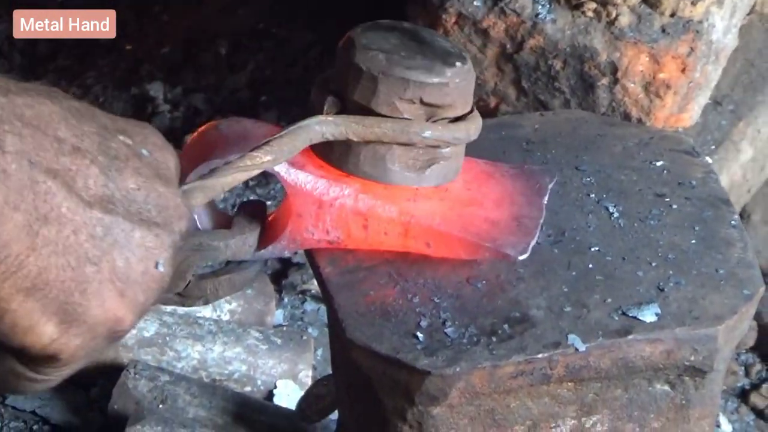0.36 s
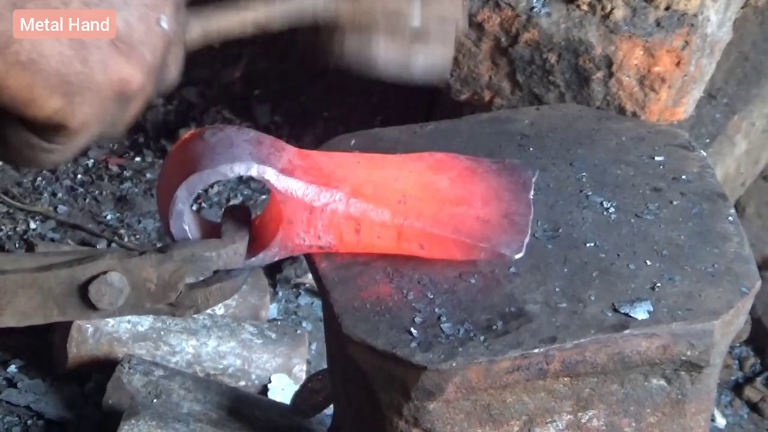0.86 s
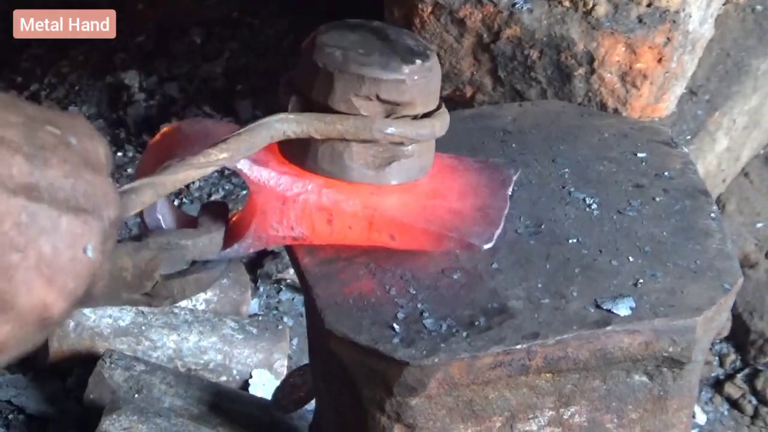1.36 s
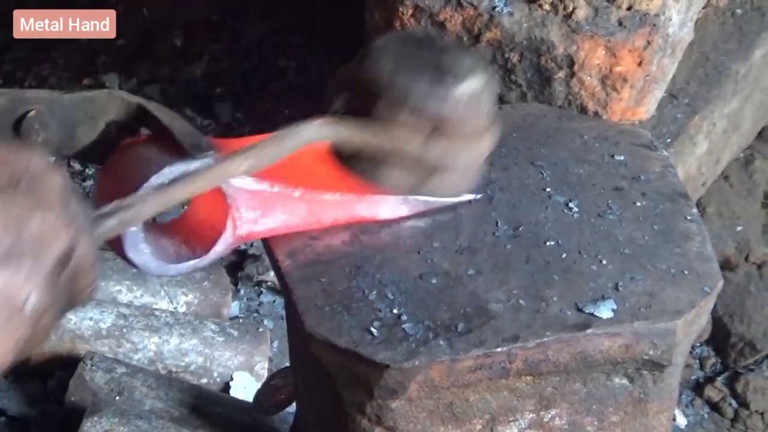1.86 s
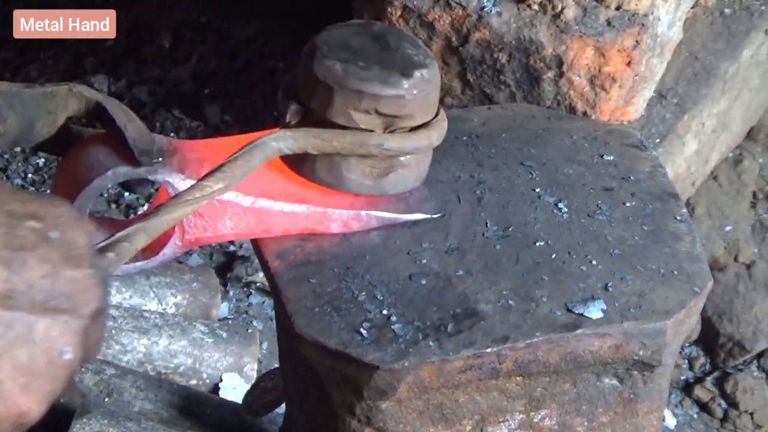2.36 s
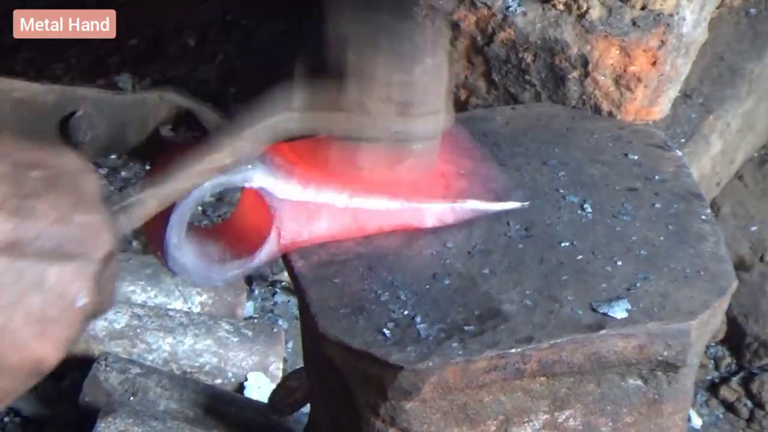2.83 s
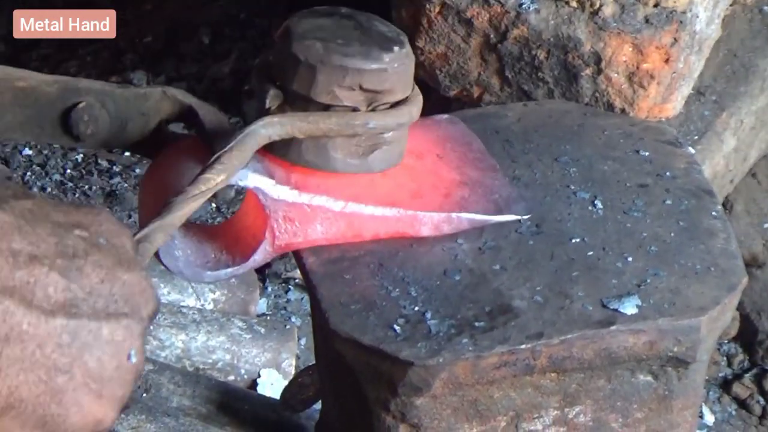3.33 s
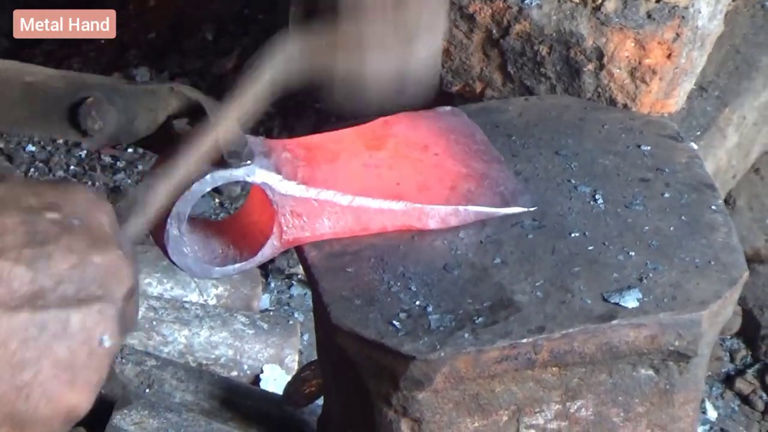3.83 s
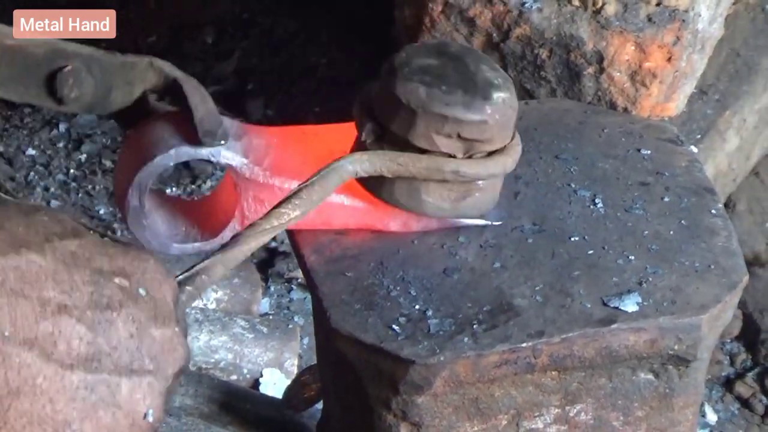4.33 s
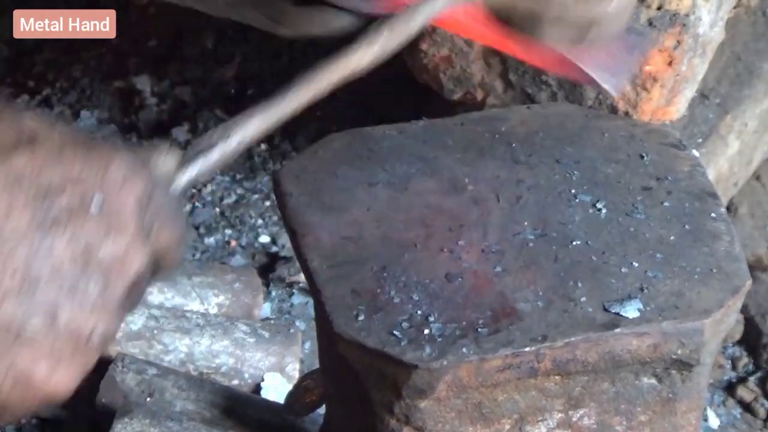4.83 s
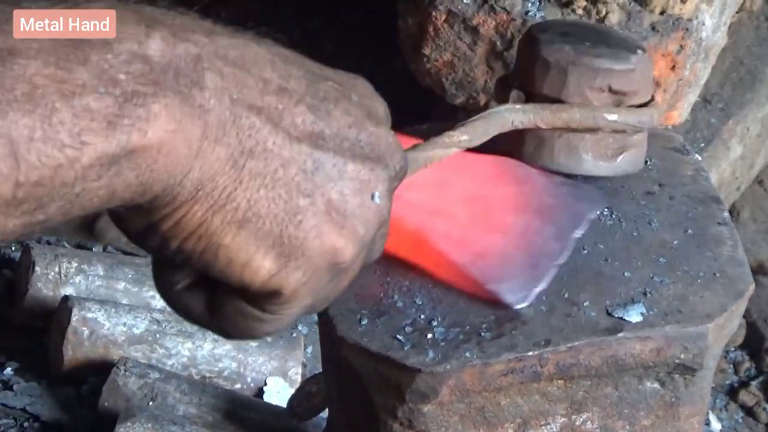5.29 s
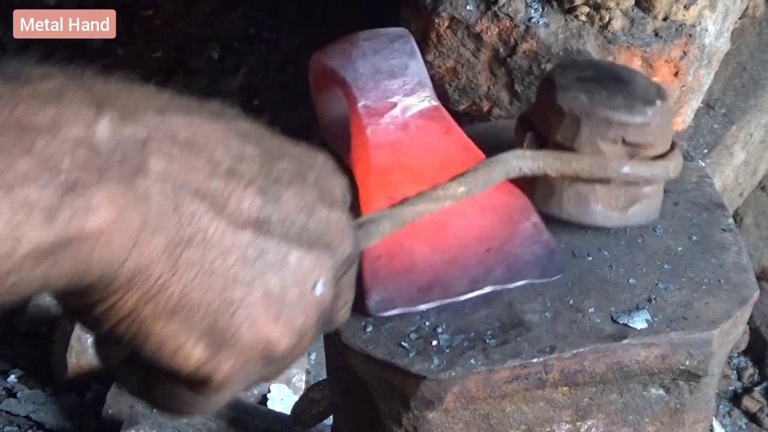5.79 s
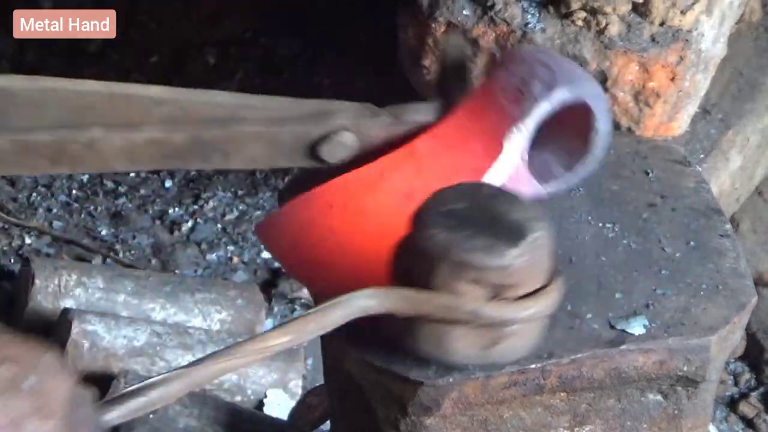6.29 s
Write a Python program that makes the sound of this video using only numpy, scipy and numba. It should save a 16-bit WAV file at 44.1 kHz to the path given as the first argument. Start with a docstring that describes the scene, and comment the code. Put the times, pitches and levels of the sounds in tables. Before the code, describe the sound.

In a small forge shed, a heavy sledge hits a set hammer on hot iron about once a second, each blow a broad crack with high ringing and a low thud. Between blows come firm, gritty taps and small tong clinks. After the fifth blow the sledge stops, leaving handling clatter, scrapes and lighter taps. Close, bright microphone, loud hits flattened, short dense echo.

```python
"""A sledge lands about once a second on a set hammer in a small forge: a broad crack, ringing heads, a thud.
Between blows a smith taps the set hammer firmly on the hot iron: a gritty burst, a dull knock, a brief ring.
Tongs and work piece clink, scrape and squeak on the anvil; these are short noise bursts and fading tones.
The shed adds a short dense tail of fading noise, over a low shudder and a soft outdoor rumble.
The close sound is bright near 9 kHz, and a fast limiter flattens the sledge blows."""
import sys
import numpy as np
from scipy import signal
from scipy.fft import rfft, irfft
from scipy.io import wavfile
from scipy.ndimage import uniform_filter1d
from numba import njit

SR = 44100
rng = np.random.default_rng(int(sys.argv[2]) if len(sys.argv) > 2 else 0)


def bounce(signal):
    """Save signal as a 16-bit WAV file at the path given by the first command-line argument."""
    frames = np.transpose(np.atleast_2d(signal))
    limited = np.clip(frames, -1, 1)
    pcm = np.round(limited * 32767).astype(np.int16)
    wavfile.write(sys.argv[1], SR, pcm)


def voltage_ratio(level):
    """Linear amplitude factor for a level in decibels (scalar or array-like)."""
    return 10 ** (np.asarray(level, float) / 20)


N = 293706  # length of the scene in samples

# Outdoor rumble and hiss. Each row: frequency in Hz, relative level in dB per Hz.
YARD_COLOUR = [(12, -43.5), (20, -18), (38, 3.5), (75, -2), (124, -2), (218, -2), (393, -5.5), (750, -9),
               (816, -10), (1320, -12.5), (3620, -17.5), (15200, -23), (16500, -46.5)]
# How wide the yard sounds. Each row: frequency in Hz, side level minus mid level in dB.
YARD_WIDTH = [(60, -10.5), (110, -21.5), (200, -8.5), (380, -3.5), (700, 0), (1290, 0), (2380, -1.5),
              (4400, -5), (8120, -12), (15000, -16.5)]
# Shudder of ground and roof. Each row: frequency in Hz, relative level in dB per Hz.
RUMBLE_COLOUR = [(15, -30), (25, -8), (54, -1), (221, -9), (260, -7.5), (436, -15.5), (600, -21),
                 (780, -35), (1320, -120)]
# How long the shed echoes. Each row: frequency in Hz, time to fall by 60 dB in seconds.
SHED_FADE = [(60, 0.3), (200, 0.22), (530, 0.21), (1400, 0.19), (3700, 0.18), (9700, 0.14), (15000, 0.12)]
# How wide the shed sounds. Each row: frequency in Hz, side level minus mid level in dB.
SHED_WIDTH = [(60, -34), (110, -25), (200, -15.5), (380, -14), (700, -9.8), (1290, -6.5), (2380, -11.5),
              (4400, -4.5), (8120, -10), (15000, -13)]

# Tong joint. One row: start in seconds, length in seconds, first pitch in Hz, last pitch in Hz, level in dB.
TONG_SQUEAK = (6.355, .14, 2760, 2530, -65)
# Iron dragged over the anvil face. Each row: start in seconds, level in dB, bass in dB, middle in dB,
# knock frequency in Hz.
SCRAPE_EVENTS = [(0.0034, -50.5, 10, 8, 2000), (1.0042, -60.5, -1, 4, 8440),
                 (1.7338, -40.5, 12.5, 12.5, 4580), (5.123, -31.5, 0.5, 8.5, 11000),
                 (5.4523, -50, -3, 20, 9740), (6.4751, -48, -4.5, 3, 2590), (6.492, -47, 4, 11, 1980)]
# Tongs and work piece clinking on the anvil. Each row: start in seconds, level in dB, bass in dB,
# middle in dB, knock frequency in Hz.
CLINK_EVENTS = [(0.0299, -42, 9, 8, 5040), (0.0622, -47, -1, 3, 8150), (0.7021, -36.5, -8, 11, 8400),
                (0.9544, -47, 10, 16, 5710), (0.9895, -44.5, 7, 13, 2116), (1.8019, -44.5, 28.5, 18, 2480),
                (1.8516, -34.5, 3, 14, 1830), (2.058, -52.5, 22, 20, 2060), (2.789, -34.5, -4, 5, 1870),
                (2.796, -41, 0, 10, 1870), (2.803, -50.5, -5.5, 9.5, 2230), (3.1438, -36, -10, 4, 5860),
                (3.554, -46, -6.5, 8.5, 8400), (3.5715, -32, -6.5, 7, 8990), (3.776, -47, -8, 4.5, 8300),
                (3.817, -41, -8, 11, 9300), (3.826, -36, -14, 8, 7700), (3.842, -45, -13, 12, 9200),
                (4.9481, -36.5, 12, 8, 6390), (5.474, -41.5, -12, 15, 6600),
                (5.4864, -55, -9.5, 15.5, 6600), (5.5307, -43.5, 9, 19, 3580),
                (5.5494, -33, 3.5, 17, 10760), (5.6075, -23, -7, 6, 5325), (5.7075, -39.5, 17, 19, 10200),
                (5.738, -31.5, 22, 18, 6100), (6.4527, -42.5, 12, 7, 2600), (6.507, -38, 2.5, 11.5, 5520)]
# Set hammer laid firmly on the iron. Each row: start in seconds, level in dB, bass in dB, middle in dB,
# knock frequency in Hz.
TAP_EVENTS = [(0.0928, -16, 5.5, 12, 4740), (0.7739, -17.5, 2, 10, 5120), (1.0808, -14, 2, 10, 5300),
              (1.8652, -11.5, -5, 8, 4600), (2.2221, -14.5, 2.5, 5, 4060), (2.8723, -10.5, -0.5, 4.5, 6400),
              (3.1946, -15.5, 5, 11.5, 4600), (3.898, -12.5, 0, 4.5, 4710), (4.269, -11.5, -2, 8.5, 5000),
              (4.9705, -20.5, -0.5, 3.5, 6150), (5.1657, -18.5, 0, 9, 8320), (5.21, -24, 5.5, 6, 8200),
              (6.2015, -26.5, -12, 7, 10580), (6.2445, -33, -4, 9.5, 10000)]
# Jaws and reins of the tongs. Each row: frequency in Hz, relative level in dB, time to fall by 60 dB in seconds.
TONG_MODES = [(2050, -29.5, .02), (3400, -29, .02), (4550, -20.5, .02), (6200, -19.5, .02),
              (8050, -9, 0.02), (9300, -6, 0.019), (9600, 3, .016), (11300, -10, .014),
              (12200, -20.5, .015), (13000, -24, .015)]
# Set hammer head, damped by hot iron. Each row: frequency in Hz, relative level in dB,
# time to fall by 60 dB in seconds.
SET_HAMMER_MODES = [(4470, -16, 0.015), (5120, -19.5, .012), (6870, -17, .012), (7770, -10, 0.032),
                    (8420, -8, .016), (8980, 0, 0.025), (9830, -11.5, 0.007), (12200, -16.5, .015),
                    (13000, -23.5, .015)]
# Crushing noise of taps, clinks and scrapes. Each row: frequency in Hz, relative level in dB per Hz.
CRUSH_COLOUR = [(88, -39.5), (150, -22), (231, -9.5), (409, -14), (630, -8.5), (1010, -14.5), (2500, -16),
                (4690, -11.5), (6050, -6), (9150, 7.5), (14400, -9), (15300, -19.5), (16500, -54.5)]
# Where the bass, middle and top of a contact are set. Each entry: frequency in Hz.
TILT_POINTS = [840, 3240, 7510]

# Sledge blows. Each row: start in seconds, then relative levels in dB of the thud, the lower head ring,
# the upper head ring and the long ring.
SLEDGE_BLOWS = [(-0.5, -18, -12, -8, -20), (0.4674, -20, -8.5, -2.5, -18),
                (1.4885, -16.5, -7.5, -17, -24.5), (2.5316, -17, -6.5, -1, -29),
                (3.5759, -16.5, -17.5, -7, -26.5), (4.6325, -17.5, -1, -11.5, -23.5)]
# Crack of the sledge. Each row: frequency in Hz, relative level in dB per Hz.
SLEDGE_COLOUR = [(130, -18.5), (220, -8), (461, -5.5), (605, -11), (662, -5), (808, -8.5), (917, -6.5),
                 (2570, -14), (6810, -8.5), (9420, -3), (13000, -14), (14500, -27.5), (16500, -64.5)]
# Sledge head and set hammer. Each row: frequency in Hz, relative level in dB, time to fall by 60 dB in seconds,
# ring group (0 lower, 1 upper, 2 long).
HEAD_MODES = [(7975, -12, .2, 0), (8380, 0, .17, 0), (8600, -12, .14, 0), (9130, -12, .14, 1),
              (9543, 0, .17, 1), (11100, -16, .12, 1), (12085, -10, .14, 1), (14057, -2, .75, 2),
              (4140, -25, .7, 2)]
# Anvil stump and earth floor. Each row: frequency in Hz, relative level in dB, time to fall by 60 dB in seconds.
STUMP_MODES = [(145, 1, .24), (203, -5, .22), (253, -5, .22), (323, -1, .22), (465, -5, .2), (680, -9, .16),
               (910, -8, .15)]


def at(table, hz):
    """Reads a value between the rows of a table, with frequency on a log axis."""
    table_hz, values = np.array(table).T
    return np.interp(np.log(np.maximum(hz, 1)), np.log(table_hz), values)


def noise(table, size):
    """Steady noise shaped by a colour table, then scaled to an rms of 1."""
    hz = np.fft.rfftfreq(size, 1 / SR)
    x = irfft(rfft(rng.standard_normal(size)) * voltage_ratio(at(table, hz)), size)
    return x / x.std()


def waver(rate, depth_db, size):
    """Slow random swell, as of echoes and near-twin modes beating; rate is in random steps per second."""
    step = int(SR / rate)
    levels = np.repeat(rng.standard_normal(size // step + 1), step)
    return voltage_ratio(depth_db * uniform_filter1d(levels, step)[:size])


def ring(hz, t60, size):
    """One way a solid body rings: a sine that falls by 60 dB in t60 seconds."""
    t = np.arange(size) / SR
    return np.sin(2 * np.pi * hz * t) * 1000. ** (-t / t60)


def burst(table, shape, tilt=1, count=2):
    """Dense crushing noise that keeps a smooth colour however short; rms is near 1 where the shape is 1."""
    size = len(shape)
    colour = voltage_ratio(at(table, np.fft.rfftfreq(size, 1 / SR))) * tilt
    x = rng.standard_normal(size)
    for _ in range(count):
        # keep only the phases of the shaped noise and give it the wanted colour again
        phase = np.angle(rfft(x * np.sqrt(shape)))
        x = irfft(colour * np.exp(1j * phase), size)
    x = x * np.minimum(10 * shape, 1)
    return x * np.sqrt(np.sum(shape ** 2) / np.sum(x ** 2))


def add(track, s, sound):
    """Mixes a sound in at a time in seconds, which may lie before the start."""
    i = int(s * SR)
    track[max(i, 0):max(i + len(sound), 0)] += sound[max(-i, 0):N - i]


def yard():
    """Steady low outdoor rumble over microphone hiss, made of coloured noise; mid and side."""
    hz = np.fft.rfftfreq(N, 1 / SR)
    mid = noise(YARD_COLOUR, N)
    side = irfft(rfft(noise(YARD_COLOUR, N)) * voltage_ratio(at(YARD_WIDTH, hz)), N)
    return voltage_ratio(-61.5) * np.array([mid, side])


def rumble(size=SR):
    """Ground and roof shudder on after each sledge blow as slowly fading low noise; mid and side."""
    out, t = np.zeros((2, N)), np.arange(size) / SR
    fade = (1 - np.exp(-t / 0.04)) * 1000. ** (-t / 1.314) * voltage_ratio(-41.5)
    for s, *_ in SLEDGE_BLOWS:
        add(out[0], s, fade * noise(RUMBLE_COLOUR, size))
        add(out[1], s, fade * noise(RUMBLE_COLOUR, size) * voltage_ratio(-21.5))
    return out


def shed(first_ms=0.59, build_ms=3.1, late_db=-34, size=SR):
    """Echo tails of the shed, mid and side: half-octave bands of noise, each dying at its own rate."""
    t = np.maximum(np.arange(size) / SR - first_ms / 1000, 0)
    hz = np.fft.rfftfreq(size, 1 / SR)
    spectra, tails = rfft(rng.standard_normal((2, size))), 0
    for centre in 30 * 2 ** np.arange(0, 9.6, .5):
        share = np.maximum(1 - 2 * abs(np.log2(np.maximum(hz, 1) / centre)), 0)
        t60 = at(SHED_FADE, centre)
        early = 1000. ** (-t / t60)
        # a faint slower tail returns from the yard outside
        late = voltage_ratio(late_db) * 1000. ** (-t / (3.2 * t60))
        fade = (early + late) * (1 - np.exp(-t * 1000 / build_ms))
        width = voltage_ratio([[0], [at(SHED_WIDTH, centre)]])
        tails = tails + width * irfft(spectra * share, size) * fade / np.sqrt(np.sum(fade ** 2))
    return tails


def squeak():
    """The tong joint squeaks faintly: a wavering sine that falls in pitch."""
    start, length, from_hz, to_hz, db = TONG_SQUEAK
    size = int(length * SR)
    turns = np.cumsum(np.linspace(from_hz, to_hz, size)) / SR
    swell = np.hanning(size) * waver(154, 5.3, size)
    out = np.zeros(N)
    add(out, start, voltage_ratio(db) * swell * np.sin(2 * np.pi * turns))
    return out


def contacts(table, modes, rise_ms, hold_ms, fall_ms, grit_db, ring_db, knock_db, size=4096):
    """Iron on iron: a short gritty burst of crushed scale, a dull knock and a brief ring of the tool."""
    out, ms = np.zeros(N), np.arange(size) * 1000 / SR
    hz = np.maximum(np.fft.rfftfreq(size, 1 / SR), 1)
    onset = 1 - np.exp(-ms / rise_ms)
    push = onset * np.exp(-np.maximum(ms - hold_ms, 0) / fall_ms)
    spots = rng.standard_normal((len(table), len(modes)))
    for (s, db, bass_db, middle_db, knock_hz), spot in zip(table, spots):
        tilt_db = np.interp(np.log(hz), np.log(TILT_POINTS), [bass_db, middle_db, 0])
        # the knock is a bump in the colour, 590 Hz to either side
        tilt_db = tilt_db + knock_db * np.exp(-((hz - knock_hz) / 590) ** 2)
        # each touch lands on another spot and wakes the modes differently, with a scatter of 4 dB
        tool = sum(voltage_ratio(mode_db + ring_db + 4 * luck) * ring(mode_hz, t60, size)
                   for (mode_hz, mode_db, t60), luck in zip(modes, spot))
        # grit breaks up the push but leaves its energy
        gritty = push * waver(330, grit_db, size)
        gritty = gritty * np.linalg.norm(push) / np.linalg.norm(gritty)
        # random lumps in the colour, one step every 24 frequency bins
        lumps = waver(SR / 24, 3, len(hz))
        crush = burst(CRUSH_COLOUR, gritty, voltage_ratio(tilt_db) * lumps)
        add(out, s, voltage_ratio(db) * (crush + onset * tool))
    return out


def handling():
    """Tongs and work piece on the anvil: short ringing clinks, longer gritty drags and a squeak."""
    clinks = contacts(CLINK_EVENTS, TONG_MODES, rise_ms=0.91, hold_ms=1.3, fall_ms=2.5,
                      grit_db=4.0, ring_db=0.0, knock_db=11.0)
    scrapes = contacts(SCRAPE_EVENTS, TONG_MODES, rise_ms=2.7, hold_ms=3.5, fall_ms=16.0,
                       grit_db=5, ring_db=1.0, knock_db=12.0)
    return clinks + scrapes + squeak()


def taps():
    """Firm taps of the set hammer; the hot iron damps the contact, so the ring is brief."""
    return contacts(TAP_EVENTS, SET_HAMMER_MODES, rise_ms=2.65, hold_ms=6.06, fall_ms=2.2,
                    grit_db=7.5, ring_db=-1.7, knock_db=6.0)


def sledge(fall_ms=8.1, size=SR, count=4096):
    """Sledge blows: a broad crack of noise; apart from it the ringing heads and the thud into the stump."""
    cracks, rings, t = np.zeros(N), np.zeros(N), np.arange(size) / SR
    short = t[:count]
    shape = (1 - np.exp(-short / 0.0019)) * np.exp(-short * 1000 / fall_ms)
    for s, thud_db, *ring_db in SLEDGE_BLOWS:
        crack = burst(SLEDGE_COLOUR, shape)
        heads, thud = np.zeros(size), np.zeros(size)
        for hz, db, t60, group in HEAD_MODES:
            heads += voltage_ratio(db + ring_db[group]) * ring(hz, t60, size) * waver(70, 3.5, size)
        for hz, db, t60 in STUMP_MODES:
            # the heavy stump takes a few cycles to get moving
            start = 1 - np.exp(-t * hz / 7.0)
            thud += voltage_ratio(db) * ring(hz, t60, size) * start * waver(35, 5, size)
        add(cracks, s, voltage_ratio(-1.78) * crack)
        add(rings, s, heads + voltage_ratio(thud_db) * thud)
    return cracks, rings


def scene():
    """Puts the direct sounds in the middle and the echoes around them, as left and right."""
    cracks, rings = sledge()
    firm, light = taps(), handling()
    # the sledge is further off, so its crack feeds the shed more strongly
    send = voltage_ratio(6.5) * cracks + voltage_ratio(-6.0) * rings + voltage_ratio(-1.0) * firm + voltage_ratio(0.5) * light
    echoes = signal.fftconvolve(send[None], shed(), axes=1)[:, :N]
    mid, side = echoes + yard() + rumble()
    mid = mid + cracks + rings + firm + light
    return np.array([mid + side, mid - side])


@njit
def limit(x, top, ratio, attack, release):
    """Limiter gain: follows the size of the sound and holds back what rises above the top."""
    gain, level = np.ones(len(x)), 0.
    for i in range(len(x)):
        level += (x[i] - level) * (attack if x[i] > level else release)
        if level > top:
            gain[i] = (top / level) ** (1 - 1 / ratio)
    return gain


def low_pass(x):
    """Removes everything above the highest recorded frequency."""
    return signal.sosfilt(signal.butter(12, 16810, fs=SR, output="sos"), x)


def record(dry):
    """A fast limiter, soft rounding of what slips past it, then a dull top and thin bass."""
    loudest = abs(dry).max(0)  # the louder channel steers both
    attack_s, release_s = 0.00014, 0.003
    gain = limit(loudest, 0.16, 3.4, 1 / (attack_s * SR), 1 / (release_s * SR))
    rounded = 0.55 * np.tanh(dry * gain / 0.61)
    dull = signal.sosfilt(signal.butter(6, 15600, fs=SR, output="sos"), rounded)
    mix = signal.sosfilt(signal.butter(2, 40, "high", fs=SR, output="sos"), dull)
    return low_pass(mix)


dry = scene()
out = record(dry)
bounce(out)
```